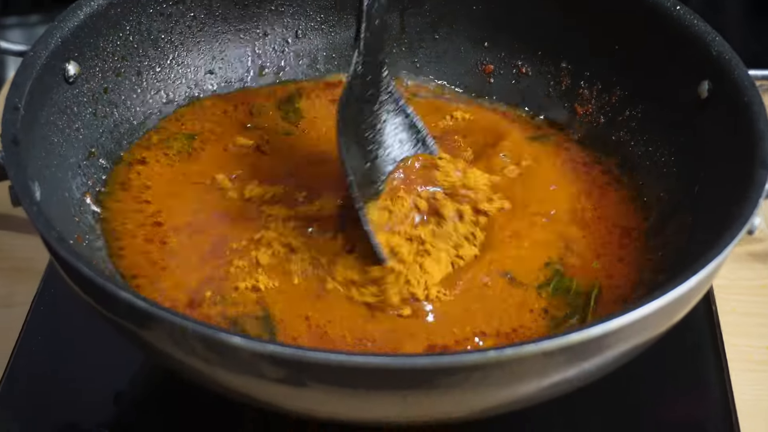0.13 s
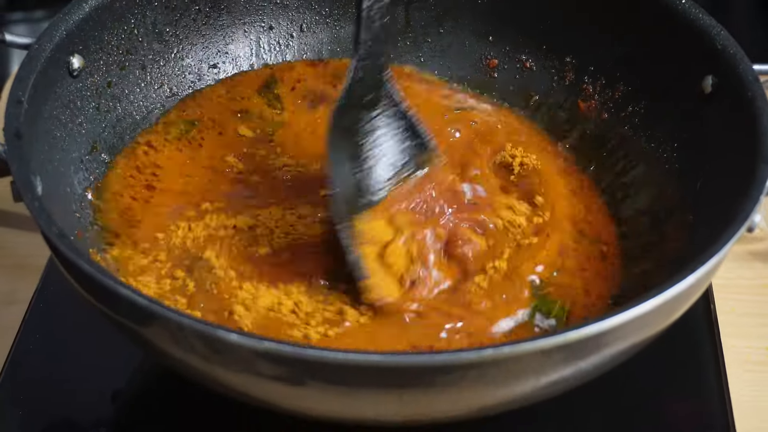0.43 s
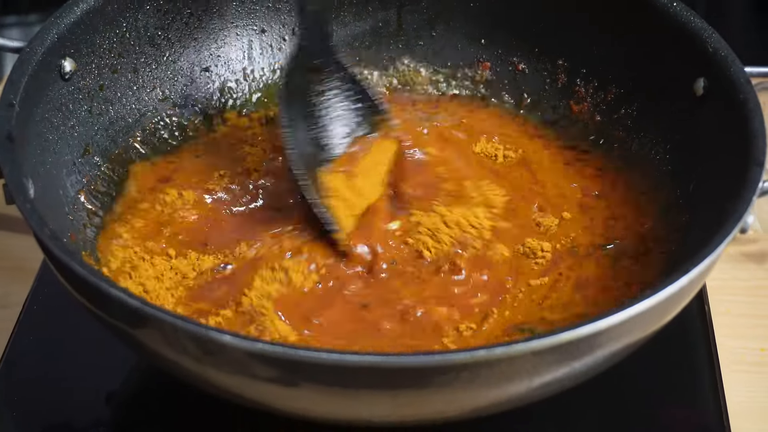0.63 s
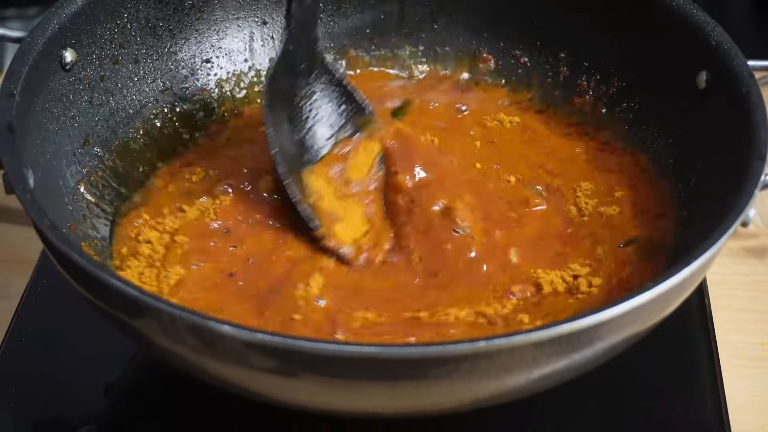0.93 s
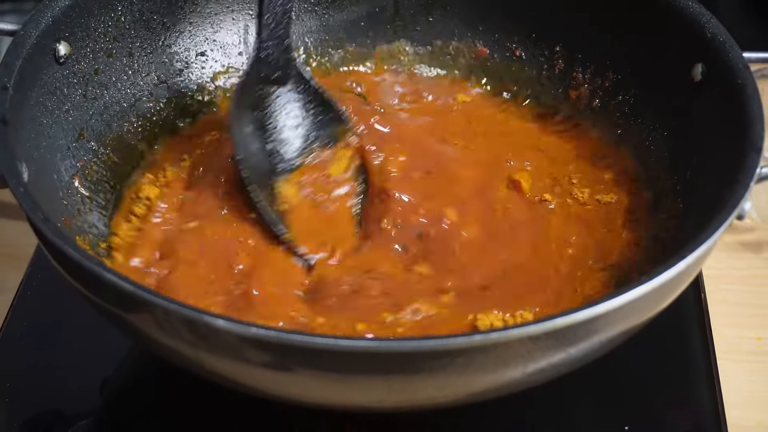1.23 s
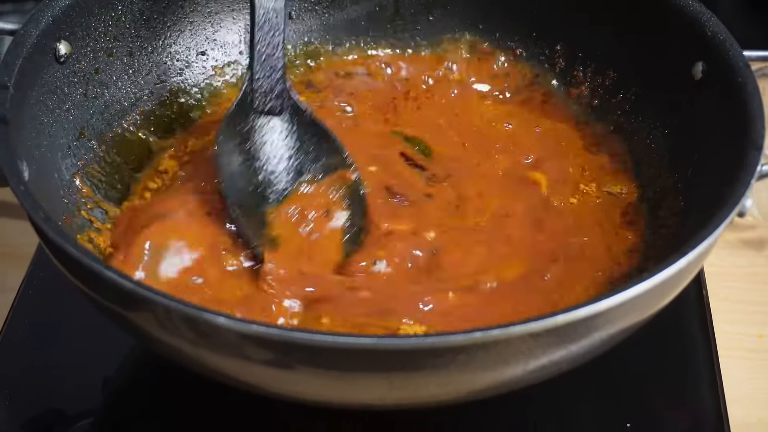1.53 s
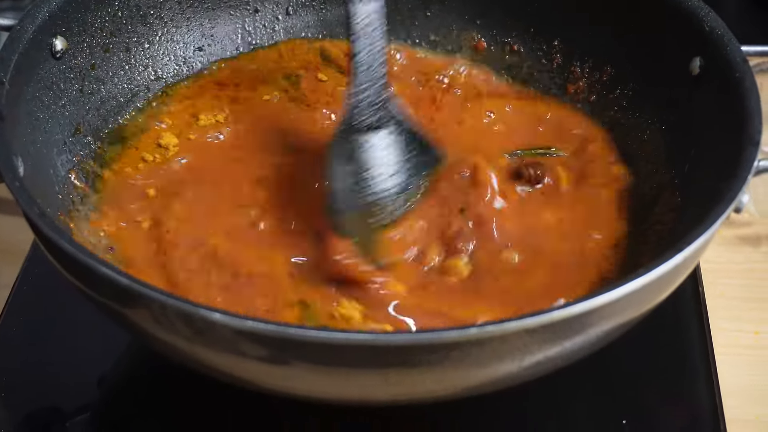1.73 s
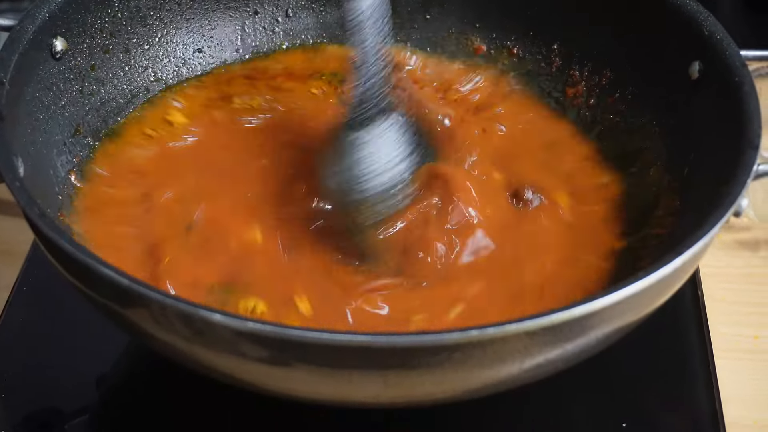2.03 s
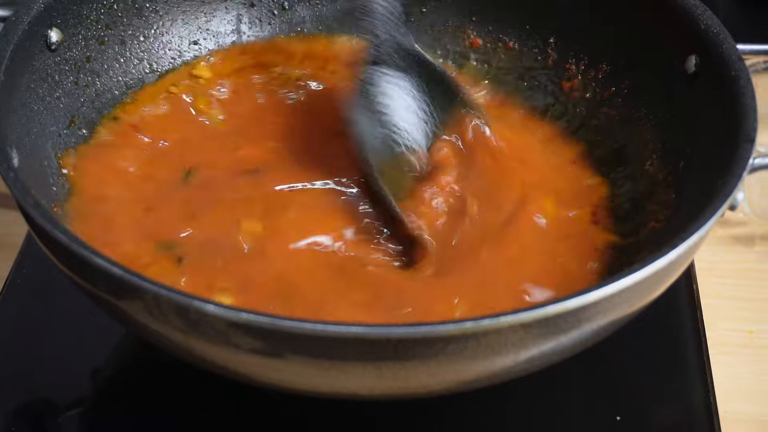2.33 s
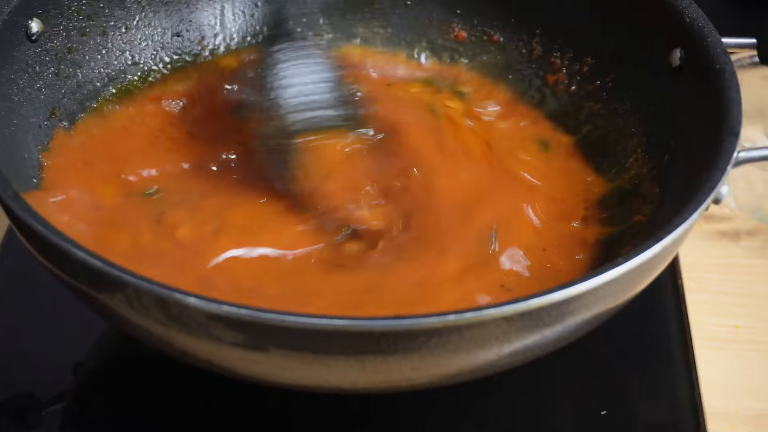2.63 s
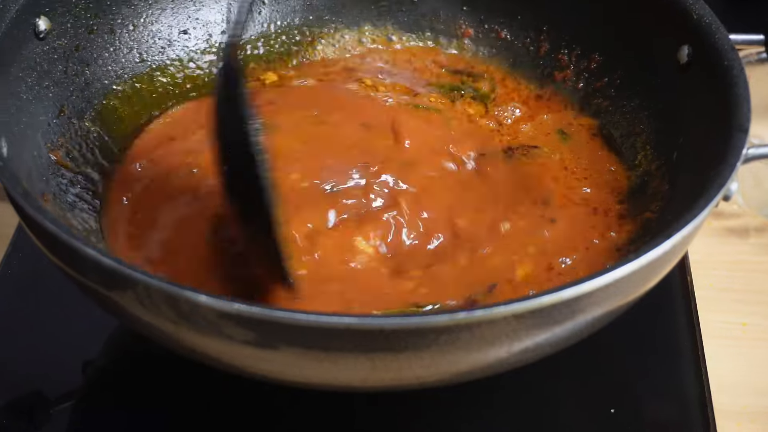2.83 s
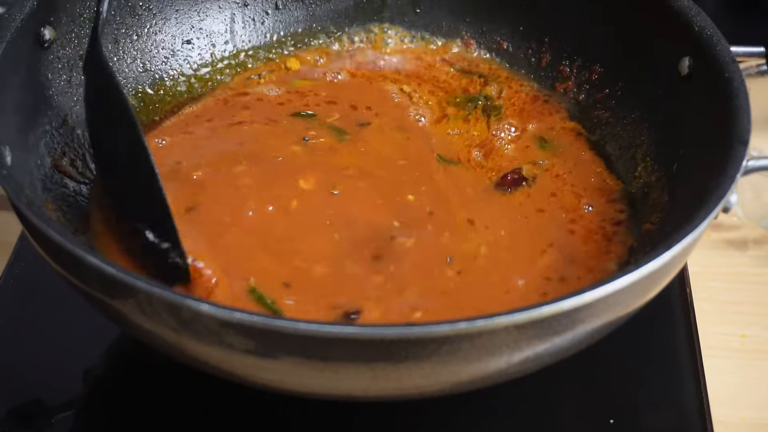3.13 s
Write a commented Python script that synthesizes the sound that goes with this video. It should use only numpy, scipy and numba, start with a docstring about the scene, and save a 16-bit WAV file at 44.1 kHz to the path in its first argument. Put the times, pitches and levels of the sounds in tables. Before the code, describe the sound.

Close up in a kitchen, thick gravy bubbles and hisses in a hot pan throughout. Quick ladle strokes make it sputter in surges, with occasional gritty scrapes and, later, tiny oil spits, over a faint fan hum.

```python
"""Thick gravy boils in a pan on a hob: countless tiny bubbles burst, each with a quickly dying ring.
A ladle stirs about three strokes a second and scrapes through grit. Each stroke washes sauce up the
hot wall, which smothers the fine sizzle and sputters coarsely; the film left behind sears, and oil
spits on the bare wall. Single fat bubbles pop over the whirr of the hob's fan."""
import sys
import numpy as np
from scipy import signal
from scipy.fft import rfft, irfft
from scipy.io import wavfile
from numba import njit

SR = 44100
rng = np.random.default_rng(int(sys.argv[2]) if len(sys.argv) > 2 else 0)


def persist_wave(psi):
    """Save psi, clipped to +-1, as 16-bit WAV."""
    counts = np.round(np.clip(psi, -1, 1) * 32767).astype(np.int16)
    wavfile.write(sys.argv[1], SR, np.atleast_2d(counts).T)


N = 145530

# how loud the sauce simmers (time [s], level [dB])
SIMMER_LOUDNESS = [(0, -42), (.3, -38.5), (.7, -37.5), (1.9, -37.5), (2.14, -36), (2.2, -41.5),
                   (2.3, -37.5), (2.95, -38), (3.3, -39)]
# how thick sauce dulls its bubbles (frequency [Hz], gain [dB])
SAUCE_TONE = [(5000, 1), (7000, 2), (9000, -3.5), (16000, -9)]
# how loud the rim sizzles (time [s], level [dB])
SIZZLE_LOUDNESS = [(0, -42), (.35, -39), (.7, -35), (.95, -37), (1.95, -38), (2.5, -37.5), (3.1, -35.5),
                   (3.3, -41)]
# tone of the fan's rushing air (frequency [Hz], gain [dB])
RUSH_TONE = [(25, -42), (60, -26.5), (108, -21), (128, -8), (155, -10.5), (190, -5), (300, -4.5),
             (420, -1.5), (560, 1), (800, -2.5), (1200, 3), (3000, -14.5), (16000, -49)]
# the notes in the fan's hum (frequency [Hz], level [dB])
HUM_NOTES = [(124, -79), (175, -76), (246, -73), (554, -69)]
# the fan growing a little louder (time [s], gain [dB])
FAN_RISE = [(0, 1), (3.3, 2.5)]
# how wide the fan sounds (frequency [Hz], side gain [dB])
FAN_SPREAD = [(130, -24), (250, -21.5), (600, -12), (1600, -30)]
# sauce washing up the wall (time [s], half length [s], smothering [dB], sputter level [dB], pitch [Hz])
SAUCE_WASHES = [(0.014, 0.028, 3.5, -43, 2300), (0.19, 0.057, 6, -43.5, 2200),
                (0.538, 0.058, 10, -37.5, 1845), (0.855, 0.05, 5, -40, 2200),
                (1.176, 0.044, 6.5, -36.5, 2000), (1.466, 0.029, 7.5, -38, 1800),
                (1.758, 0.023, 6.5, -34.5, 2190), (2.09, 0.028, 3.5, -36, 1750),
                (2.384, 0.062, 4.5, -39, 1680), (2.754, 0.036, 2, -36, 1770),
                (3.074, 0.058, 7.5, -38.5, 1750)]
# the part of the sound that a wash can smother (frequency [Hz], gain [dB])
SMOTHERED_TREBLE = [(2000, -28), (4000, -51), (6000, -11.5), (8000, 0)]
# single fat bubbles (time [s], level [dB], pitch [Hz], ring length [cycles])
FAT_BUBBLES = [(0.05, -19, 3870, 0.6), (.066, -19, 2100, .7), (.071, -12, 3170, 0.25),
               (0.0928, -16, 2580, 0.49), (.1222, -12, 2190, 0.27), (.1608, -18.5, 2830, 2),
               (.300, -25, 3520, 7.3), (.422, -26, 4920, 11), (.787, -12, 3100, 0.96),
               (0.8186, -17, 3060, 1.4), (.881, -18, 2660, 1.6), (0.9145, -20.5, 2850, 5.3),
               (.972, -14.5, 3840, 0.25), (1.056, -26, 4200, 0.45), (1.2275, -21, 3040, 1.2),
               (1.376, -19, 4770, 1), (1.543, -12, 2550, 1), (1.667, -17, 4900, 4.1),
               (1.783, -21, 6560, 1.6), (1.847, -18, 2820, 2.4), (2.016, -16, 3930, 1.4),
               (2.117, -21, 2680, 2.2), (2.138, -19, 4500, 2.5), (2.1676, -18.5, 4100, 3.7),
               (2.213, -26, 1910, 6), (2.225, -25, 1130, 3.1), (2.293, -13.5, 4840, 1),
               (2.337, -17, 1780, 2.3), (2.379, -18, 5040, 0.64), (2.432, -22, 1760, 1.06),
               (2.563, -21, 2110, 6.5), (2.6373, -15.5, 2020, 0.92), (2.658, -12, 4200, 0.51),
               (2.688, -23.5, 1720, 6.1), (2.713, -16, 2660, 2), (2.793, -11.5, 3900, 0.9),
               (2.467, -24, 6000, 1.3), (2.474, -14, 3770, 0.38), (2.847, -20, 5500, 0.68),
               (2.993, -15.5, 6000, 0.4), (3.007, -19, 2600, 0.93), (3.119, -23, 1920, 1.3),
               (3.174, -14, 2310, 0.63), (3.177, -16.5, 5100, 0.67)]
# their soft skin gives little bass (frequency [Hz], gain [dB])
SKIN_TONE = [(300, -8), (900, 5), (3000, 1), (6000, -2), (10000, 17), (16000, -13)]
# the thin film searing (time [s], half length [s], level [dB], pitch [Hz])
FILM_SEARS = [(0.41, 0.032, -40.5, 4040), (0.605, 0.046, -40, 3870), (0.76, 0.063, -39.5, 4840),
              (1.08, 0.042, -37.5, 4100), (1.37, 0.032, -36.5, 4400), (1.53, 0.023, -39.5, 3320),
              (1.675, 0.035, -37.5, 5130), (2.0, 0.054, -38, 5150), (2.70, 0.046, -40.5, 4180)]
# the ladle scraping (time [s], half length [s], level [dB], pitch [Hz])
LADLE_SCRAPES = [(0.85, 0.07, -36, 3180), (2.35, 0.049, -39.5, 1800), (3.018, 0.03, -34, 1720),
                 (3.085, 0.024, -36, 2430)]
# oil spitting (time [s], half length [s], level [dB], pitch [Hz])
OIL_SPITS = [(1.56, 0.023, -42.5, 12700), (1.66, 0.015, -39, 12600), (2.28, 0.014, -38, 12900),
             (2.485, 0.03, -39, 12700), (2.585, 0.032, -41, 12600), (3.15, 0.012, -37, 9800)]
# where the pan's hollow rings (frequency [Hz], width [Hz], boost [dB])
PAN_RINGS = [(1210, 170, 3), (1780, 420, 4), (2720, 360, 1.3), (5050, 900, 1), (12800, 1800, 3)]
# overall tone of the boiling (frequency [Hz], gain [dB])
BOIL_TONE = [(100, -71), (300, -12.5), (600, -8), (1000, -8.5), (1600, -5), (3300, 0.5), (5500, 4),
             (7000, 1.5), (9500, -1), (13000, 0), (16000, 0.5)]
# how wide the boiling sounds (frequency [Hz], side gain [dB])
BOIL_SPREAD = [(300, -8), (1500, -81), (3500, -38), (5200, -26), (6500, -4), (9000, -1), (16000, -2)]
# the treble leans to the right (frequency [Hz], left minus right [dB])
BALANCE = [(4000, 0), (7000, -.6), (10000, -2), (16000, -2.3)]

# clouds of small bubbles (rate [1/s], pitch spread [octaves], ring length [cycles], size scatter [dB])
SIMMER = dict(rate=6500, octaves=0.6, cycles=0.54, scatter_db=5)
PLINK = dict(rate=170, octaves=.5, cycles=7, scatter_db=3)
SIZZLE = dict(rate=9000, octaves=0.45, cycles=1.73, scatter_db=4.5)
SPUTTER = dict(rate=1300, octaves=.15, cycles=3.6, scatter_db=3.5)
SEAR = dict(rate=3600, octaves=.3, cycles=2.3, scatter_db=4.6)
GRIT = dict(rate=1200, octaves=.33, cycles=1.5, scatter_db=3.5)
SPIT = dict(rate=1400, octaves=.13, cycles=6, scatter_db=4)
SMOTHER_LEAD_S = .018  # a wash is deepest this long before its sputter peaks


def undb(db):
    """Turn decibels into a number to multiply by."""
    return 10 ** (np.asarray(db) / 20)


def curve(points):
    """Join (time, value) points by straight lines."""
    return np.interp(np.arange(N) / SR, *np.array(points).T)


def swell(at, half):
    """A smooth rise and fall around a moment."""
    return np.exp(-((np.arange(N) / SR - at) / half) ** 2)


def colour(x, points, peaks=()):
    """Turn frequencies up or down along (Hz, dB) points, and add bell-shaped peaks."""
    f = np.arange(N + 1) * SR / (2 * N)
    hz, db = np.array(points).T
    shape = np.interp(np.log(f + 1), np.log(hz), db)
    for centre, width, boost in peaks:
        shape = shape + boost / (1 + (2 * (f - centre) / width) ** 2)
    return irfft(rfft(x, 2 * N) * undb(shape))[..., :N]


@njit
def bursts(start, hz, cycles, size, side, length):
    """Each bubble rings, rises a little in pitch and dies. Gives mid (centre) and side (width)."""
    out = np.zeros((2, length))
    for k in range(len(start)):
        first, life = start[k] * SR, cycles[k] * SR / hz[k]
        for i in range(max(int(first) + 1, 0), min(int(first + 6 * life) + 1, length)):
            age = (i - first) / life
            turns = age * cycles[k] * (1 + .015 * age)
            ring = size[k] * (1 - np.exp(-6 * turns)) * np.exp(-age) * np.sin(2 * np.pi * turns)
            out[0, i] += ring
            out[1, i] += ring * side[k]
    return out


def cloud(centre_hz, rate, octaves, cycles, scatter_db, max_bubbles=50000):
    """Many bubbles burst at random moments and places, around a pitch that may move."""
    when, sign = rng.random((max_bubbles, 2))[:int(rate * N / SR)].T
    pitch, ring, size, side = rng.standard_normal((max_bubbles, 4))[:len(when)].T
    centre = (centre_hz * np.ones(N))[(when * N).astype(int)]
    hz = np.minimum(centre * 2 ** (octaves * np.maximum(pitch, -2.5)), SR * .42)
    size = undb(scatter_db * np.minimum(size, 2.4)) * np.sign(sign - .5)
    out = bursts(when * N / SR, hz, cycles * np.exp(0.25 * ring), size, side, N)
    return out / np.std(out[0])


def surges(rows, kind, sag_octaves=0):
    """A cloud that swells once per row; with sag, its pitch dips to the row's pitch and comes back."""
    power = np.array([undb(db) ** 2 * swell(at, half) for at, half, db, hz in rows]) + 1e-18
    glide = np.array([hz * 2 ** (sag_octaves * (1 - swell(at - SMOTHER_LEAD_S, 2 * half)))
                      for at, half, db, hz in rows])
    pitch = (glide * power).sum(axis=0) / power.sum(axis=0)  # the loudest row leads
    return cloud(pitch, **kind) * np.sqrt(power.sum(axis=0))


def simmer(plink_db=-6):
    """Thick sauce stops most bubbles ringing at once; a few ring on with a plink."""
    dull = colour(cloud(centre_hz=2960, **SIMMER), SAUCE_TONE)
    plinks = undb(plink_db) * cloud(centre_hz=3533, **PLINK)
    return (dull + plinks) * undb(curve(SIMMER_LOUDNESS))


def sizzle():
    """The finest bubbles burst at the rim of the sauce and blend into a hiss."""
    return cloud(centre_hz=11320, **SIZZLE) * undb(curve(SIZZLE_LOUDNESS))


def fan(rush_db=-49.5):
    """The hob's fan makes a low rush of air and a faint hum."""
    t = np.arange(N) / SR
    rise = undb(curve(FAN_RISE))
    rush = colour(rng.standard_normal((2, N)), RUSH_TONE)
    rush *= undb(rush_db) / np.sqrt(np.mean(rush ** 2))
    hum = sum(undb(db) * np.sqrt(2) * np.sin(2 * np.pi * (hz * t + rng.random()))
              for hz, db in HUM_NOTES)
    hum *= rise  # the hum grows faster than the rush
    return np.array([rush[0] + hum, colour(rush[1], FAN_SPREAD)]) * rise


def smother(x):
    """Each wash of sauce covers the hot wall and quietens the finest bubbles just before it sputters."""
    depth_db = sum(depth * swell(at - SMOTHER_LEAD_S, half) for at, half, depth, db, hz in SAUCE_WASHES)
    return x - colour(x, SMOTHERED_TREBLE) * (1 - undb(-depth_db))


def sputter():
    """Sauce meets hot metal and bubbles coarsely, lowest in pitch where the wash is deepest."""
    rows = [(at, half, db, hz) for at, half, depth, db, hz in SAUCE_WASHES]
    return surges(rows, SPUTTER, sag_octaves=.33)


def pops(clicks=5, tear_db=-11, width=.4):
    """Fat bubbles burst one by one; each skin tears in small clicks, softer for the shortest pops."""
    at, db, hz, cycles = np.array(FAT_BUBBLES).T.copy()
    cycles = np.maximum(cycles, .3)
    size = undb(db) * np.exp(0.26 / cycles)  # make up for the fading before the first crest
    side = width * rng.standard_normal(len(at))
    out = bursts(at, hz, cycles, size, side, N)
    tear = undb(db + tear_db) * np.minimum(cycles / 2, 1)
    for delay, pitch in rng.standard_normal((len(at), clicks, 2)).transpose(1, 2, 0):
        click_at = at + (1 + 2 * abs(delay)) * cycles / hz
        out += bursts(click_at, hz * 2 ** (pitch / 2), np.ones(len(at)), tear, side, N)
    return out


def sear():
    """The thin film left on the hot wall boils in small, bright bubbles."""
    return surges(FILM_SEARS, SEAR)


def scrape():
    """The ladle drags through gritty sauce, and each grain ticks."""
    return surges(LADLE_SCRAPES, GRIT)


def spit():
    """Oil droplets spit on the bare wall in short, very high sprays."""
    return surges(OIL_SPITS, SPIT)


def kitchen(x, echo_s=0.081, echo_db=-12.5, count=12):
    """Short echoes from pan and room, which keep changing as the ladle and arm move."""
    t = np.arange(SR // 2) / SR
    out = x
    for at in np.linspace(0, N / SR, count):
        tail = rng.standard_normal((2, len(t))) * undb(-60 * t / echo_s)
        tail /= np.sqrt(np.sum(tail[0] ** 2))
        piece = x * swell(at, N / SR / count)
        out = out + undb(echo_db) * signal.fftconvolve(piece, tail, axes=1)[:, :N]
    return out


def scene():
    """All bubbles sound through the pan's hollow, with their treble spread wide; the fan joins them."""
    small_bubbles = simmer() + sizzle() + spit() + sputter() + sear() + scrape()
    gravy = smother(small_bubbles) + colour(pops(), SKIN_TONE)
    mid, side = colour(kitchen(gravy), BOIL_TONE, PAN_RINGS)
    fan_mid, fan_side = fan()
    mid = mid + fan_mid
    side = colour(side, BOIL_SPREAD) + fan_side
    left = colour(mid + side, [(hz, db / 2) for hz, db in BALANCE])
    right = colour(mid - side, [(hz, -db / 2) for hz, db in BALANCE])
    return np.array([left, right])


def record(dry):
    """Cut off the very highest treble steeply."""
    top_hz = 15900
    return signal.sosfilt(signal.ellip(12, .2, 80, top_hz, fs=SR, output="sos"), dry)


dry = scene()
out = record(dry)
persist_wave(out)
```